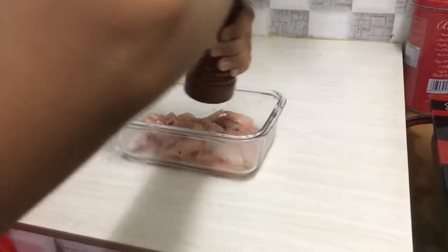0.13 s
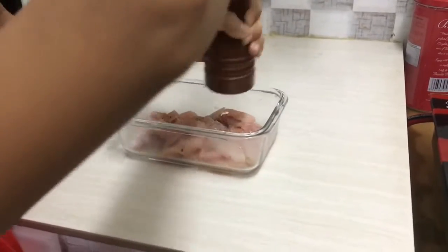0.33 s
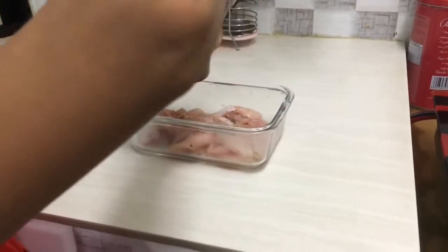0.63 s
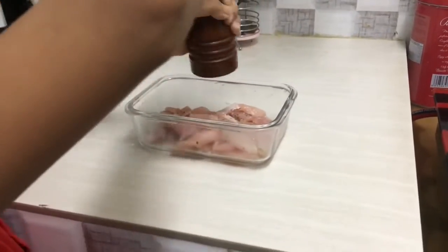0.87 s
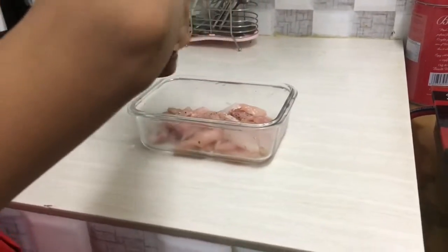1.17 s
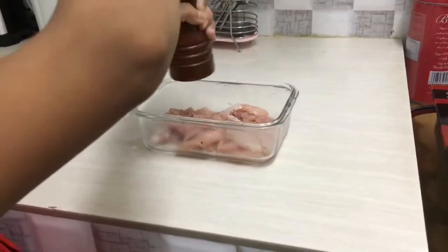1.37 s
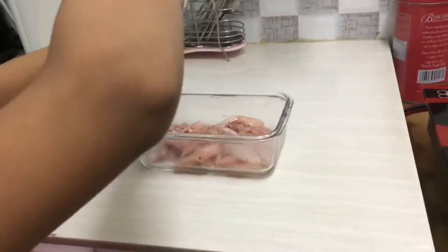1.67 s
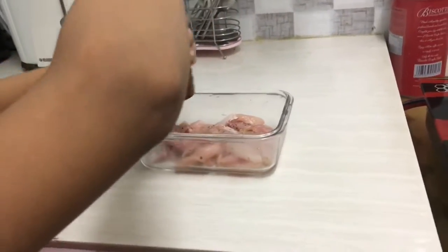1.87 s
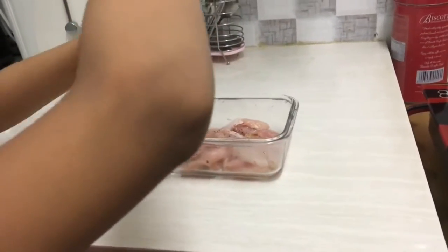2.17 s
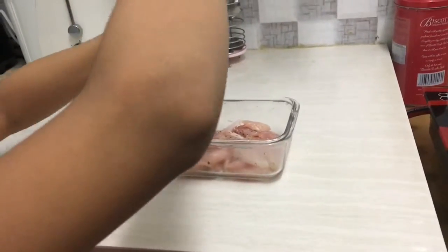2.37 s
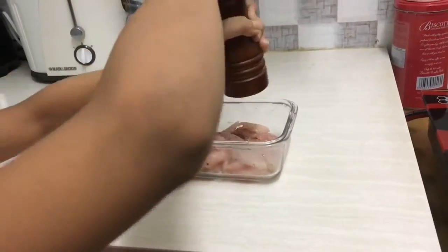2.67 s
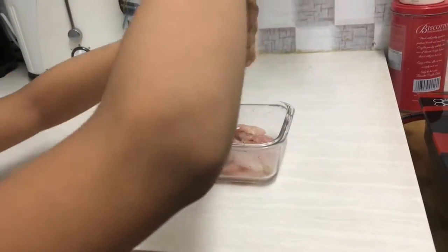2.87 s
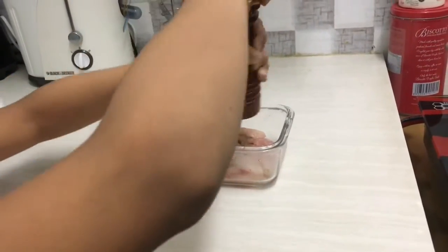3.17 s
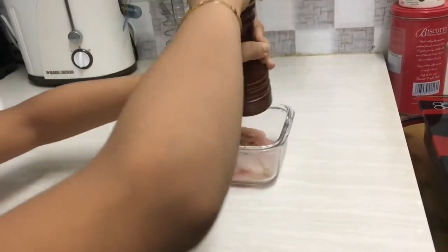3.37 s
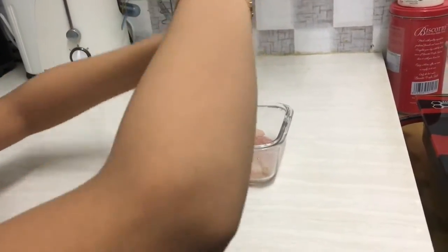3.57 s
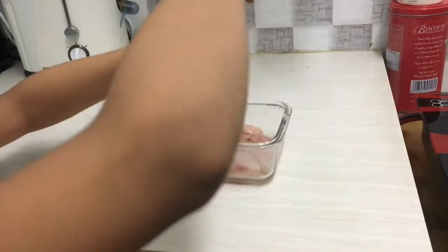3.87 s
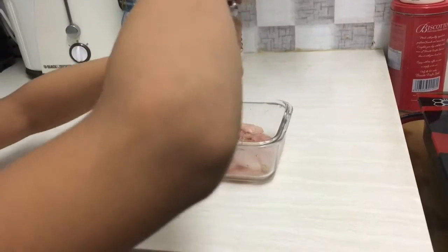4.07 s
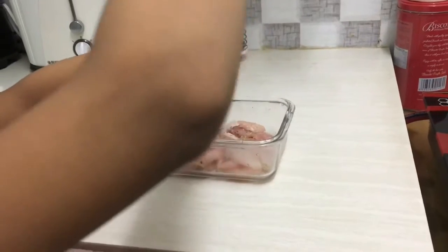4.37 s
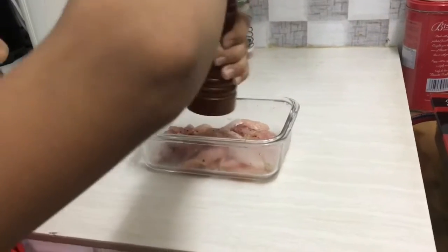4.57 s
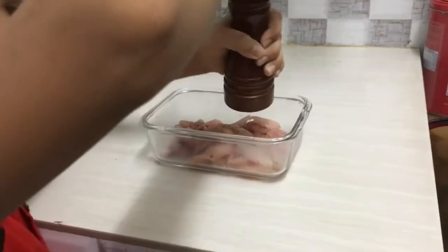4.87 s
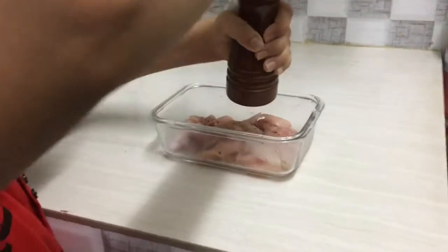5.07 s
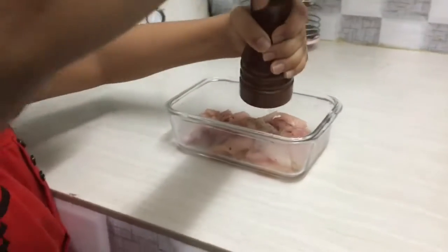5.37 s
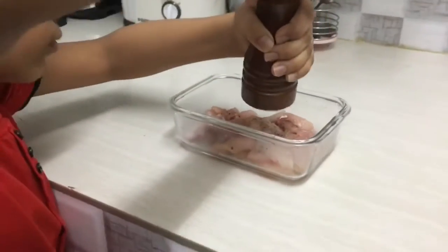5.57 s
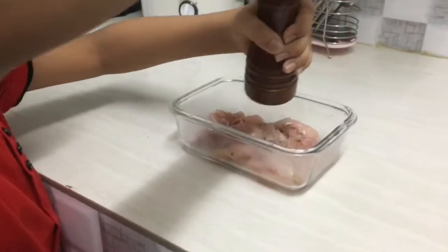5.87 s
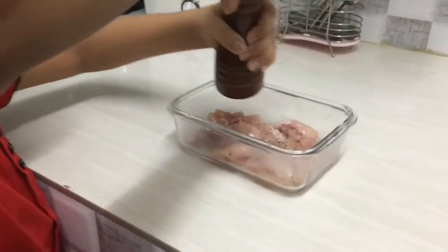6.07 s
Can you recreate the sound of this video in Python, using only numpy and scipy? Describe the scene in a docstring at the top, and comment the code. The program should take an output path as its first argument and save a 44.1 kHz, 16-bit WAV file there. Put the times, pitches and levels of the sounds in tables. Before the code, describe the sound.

A wooden pepper mill is twisted by hand close to the microphone in a quiet tiled kitchen. Short, dry, gritty rasps come about three times a second, with peppercorns snapping among them. A woody squeak comes early, a tiny ping midway, and a fainter squeak later. Grinding softens in the middle, then two very sharp cracks stand out near the end. Faint air noise and appliance hum lie underneath.

```python
"""Short gritty rasps, sharp cracks, two squeaks and one ping sound over a faint hum in a quiet tiled kitchen.
A wooden pepper mill is twisted back and forth by hand over a glass dish: random grains make the rasp,
and peppercorns caught in the burr crack as an impulse and decaying splinter noise through the mill's resonances.
Squeaks are narrow-band noise, the ping and hum are sines, and the room is decaying noise used as an echo."""
import sys
import numpy as np
from scipy import signal
from scipy.fft import rfft, irfft, next_fast_len
from scipy.io import wavfile

SR = 44100
rng = np.random.default_rng(int(sys.argv[2]) if len(sys.argv) > 2 else 0)


def bounce(signal):
    """Save signal as a 16-bit WAV file at the path given by the first command-line argument."""
    frames = np.transpose(np.atleast_2d(signal))
    limited = np.clip(frames, -1, 1)
    pcm = np.round(limited * 32767).astype(np.int16)
    wavfile.write(sys.argv[1], SR, pcm)


N = 273861

# The four frequency ranges of a crack: low_hz, high_hz, beaming (0-1), own_level_db
# (beaming: how far the room send depends on the mill's aim)
CRACK_RANGES = [(160.7, 1110, 0.43, .5), (1330, 3600, 0.33, -0.6), (4130, 9420, 0.78, 0.55),
                (8960, 15800, 0.53, 0.5)]


def from_db(db):
    """Amplitude gain is ten to the power of a twentieth of the decibels."""
    return 10 ** (np.asarray(db) / 20)


def rms_one(x):
    """Scale to unit rms, the root of the mean power."""
    return x / np.sqrt(np.mean(x ** 2) + 1e-20)


def at_hz(points, hz):
    """Interpolate a table along log frequency, where equal steps are equal intervals."""
    table = np.array(points)
    return np.interp(np.log(np.maximum(hz, 1)), np.log(table[:, 0]), table[:, 1])


def band(x, low, high, order=3):
    """Causal band-pass: a Butterworth filter, flat within its band."""
    high = min(high, SR / 2 - 1000)
    return signal.sosfilt(signal.butter(order, [low, high], "band", fs=SR, output="sos"), x)


def coloured(x, spectrum):
    """Spectral shaping: weight each frequency of a signal by a table in dB, then set its rms to 1."""
    size = next_fast_len(N)
    gain = from_db(at_hz(spectrum, np.fft.rfftfreq(size, 1 / SR)))
    return rms_one(irfft(rfft(x, size) * gain, size)[:N])


def drift(rate):
    """Slow random modulation of unit rms: chance values, rate per second, joined by straight lines."""
    knots = rng.standard_normal(4000)
    return rms_one(np.interp(np.arange(N) / SR * rate, np.arange(len(knots)), knots))


def resonance(x, hz, width):
    """A damped mode is a two-pole resonator; its bandwidth in Hz sets the decay, its peak gain is about 1."""
    r = np.exp(-np.pi * width / SR)
    numerator = np.array([1, 0, -1]) * (1 - r * r) / 2
    return signal.lfilter(numerator, [1, -2 * r * np.cos(2 * np.pi * hz / SR), r * r], x)


def background(waver_db=1.0, wander=1.0):
    """Moving air is shaped broadband noise; an appliance hums in sines of unsteady level and phase (radians)."""
    # Spectrum of the moving air: frequency_hz, relative_density_db
    air_spectrum = [(22, -15.5), (48, 1), (80, -6.5), (130, -2.5), (200, -6.5), (380, 0.5), (510, -15),
                    (680, -10), (1200, -17), (2500, -21.5), (5000, -29), (9000, -34.5), (16000, -40)]
    # Appliance hum: frequency_hz, rms_level_db (about which it wavers)
    hum_tones = [(191, -68.5), (238, -68.5), (387, -66), (652, -66)]
    air_rms_db = -59
    t = np.arange(N) / SR
    out = from_db(air_rms_db) * coloured(rng.standard_normal(N), air_spectrum)
    for hz, db in hum_tones:
        amplitude = np.sqrt(2) * from_db(db + waver_db * drift(8.3))
        out += amplitude * np.sin(2 * np.pi * hz * t + wander * drift(17))
    return out


def kitchen(x, first_echo_s=0.00057, build_s=0.0054):
    """Reverberation: counter and tiles return a dense echo that builds quickly and dies soonest in the treble."""
    # Echo strength: frequency_hz, gain_db
    echo_gain = [(150, -7.5), (500, -4), (1200, -3), (2700, -0.5), (5700, -9), (9000, -10), (15000, -10.5)]
    # Reverberation time, for a decay of 60 dB: frequency_hz, t60_s
    echo_decay = [(200, 0.29), (1000, 0.42), (2700, 0.4), (6000, 0.39), (10000, 0.32), (16000, 0.21)]
    t = np.arange(SR) / SR
    edges = np.geomspace(110, 17500, 15)
    # neighbouring bands take turns with two independent noises
    white = rng.standard_normal((2, SR))
    onset = 1 - np.exp(-np.maximum(t - first_echo_s, 0) / build_s)
    echo = np.zeros(SR)
    for k, (low, high) in enumerate(zip(edges, edges[1:])):
        hz = np.sqrt(low * high)
        fade = onset * np.exp(-np.log(1000) * t / at_hz(echo_decay, hz))
        unit_energy_fade = fade / np.sqrt(np.sum(fade ** 2))
        echo += from_db(at_hz(echo_gain, hz)) * band(white[k % 2], low, high) * unit_energy_fade
    return signal.fftconvolve(x, echo)[:N]


def ping():
    """Free vibration: a hard part is flicked and rings in a few exponentially decaying modes."""
    # The flick: start_s, level_db
    flicks = [(2.7597, -46.5)]
    # Modes of the hard part: frequency_hz, relative_level_db, t60_s
    modes = [(2710, 2, 0.09), (5950, -10, 0.24), (6070, -5, 0.24), (6080, -5, 0.25)]
    out = np.zeros(N)
    for s, db in flicks:
        start = round(s * SR)
        t = np.arange(N - start) / SR
        for hz, mode_db, t60 in modes:
            out[start:] += from_db(db + mode_db - 60 * t / t60) * np.sin(2 * np.pi * hz * t)
    return out


def squeak(width_hz=140.0, rise_s=0.008, fade_db=25.0, flutter_db=2.0):
    """Stick-slip of wood on wood: a rough, narrow tone that starts sharply, flutters and fades."""
    # Squeaks of the wooden knob: start_s, end_s, pitch_hz, initial_rms_level_db (before flutter)
    squeaks = [(1.521, 1.655, 1670, -52.5), (4.793, 4.974, 2430, -57.5)]
    t, out = np.arange(N) / SR, np.zeros(N)
    for start, end, hz, db in squeaks:
        once_filtered = resonance(rng.standard_normal(N), hz, width_hz)
        tone = resonance(once_filtered, hz, width_hz)
        gate = np.clip(np.minimum(t - start, end - t) / rise_s, 0, 1)
        out += rms_one(tone) * gate * from_db(db - np.interp(t, [start, end], [0, fade_db]))
    return out * from_db(flutter_db * drift(60))


def twisting_effort():
    """Load envelope: each twist takes hold quickly, swells or sags while the wrist turns, and dies away."""
    # Twists of the wrist, to and fro about three times a second:
    # start_s, length_s, effort_db (mid-twist), swell_db (change from start to end)
    twists = [(0.035, 0.057, -56.5, 6), (0.214, 0.16, -55.5, 0), (0.499, 0.1, -57, -0.5),
              (0.689, 0.11, -58, 6.5), (1.015, 0.081, -56, -12), (1.202, 0.15, -54.5, -4.5),
              (1.512, 0.12, -60.5, 0.5), (1.762, 0.17, -60.5, -3), (2.076, 0.13, -62.5, -1),
              (2.357, 0.16, -57, 4.5), (2.887, 0.026, -66.5, -7), (3.039, 0.063, -63.5, -3),
              (3.463, 0.18, -62, -3), (3.759, 0.11, -60, 1), (4.063, 0.16, -64, 6), (4.38, 0.07, -60, 0),
              (4.557, 0.17, -57.5, -10.5), (5.082, 0.08, -54.5, -6), (5.318, 0.15, -54.5, 2),
              (5.879, 0.094, -61, -7), (6.1, 0.083, -59, -0.5)]
    attack_s, release_s = .025, 0.035   # length of the rise; time constant of the letting go
    resting_effort_db = -75.5   # grit still shifting between twists
    t = np.arange(N) / SR
    effort = np.full(N, from_db(resting_effort_db))
    for start, length, db, swell_db in twists:
        attack = np.clip((t - start) / attack_s + .5, 0, 1)
        hold = from_db(db + swell_db * np.interp(t, [start, start + length], [-.5, .5]))
        release = np.exp(-np.maximum(t - start - length, 0) / release_s)
        effort += attack * hold * release
    return effort


def rasp(catch_db=1.5, level_db=0.5):
    """Granular friction: effort crushes more grains between the teeth; now and then a larger crumb crunches."""
    # Colour of the rasp: frequency_hz, relative_density_db
    rasp_spectrum = [(250, -35.5), (550, 5), (1050, 6), (1800, 4.5), (2800, 3), (4500, -0.5), (5600, 5),
                     (7300, -3), (9000, -2.5), (10800, -8), (13000, -6.5), (16000, -19)]
    grains_per_s, size_db = 4500, 2.8   # rate where busy is 1; scale of the random grain sizes
    crumbs_per_s, crumb_s, crumb_gain = 40, .0016, 1.7   # rate where busy is 1; decay time constant
    effort = twisting_effort()
    busy = np.sqrt(effort / effort.mean())
    born = rng.random(N) < grains_per_s * busy / SR
    sizes = from_db(size_db * np.minimum(rng.exponential(1, N), 5)) * rng.choice([-1, 1], N)
    crumbs = (rng.random(N) < crumbs_per_s * busy / SR) * rng.uniform(0.22, 0.83, N)
    crumb_decay = np.exp(-1 / (crumb_s * SR))
    crunch = 1 + crumb_gain * signal.lfilter([1], [1, -crumb_decay], crumbs + 1e-18)
    # dividing by sqrt(busy) evens out the grain power, so that effort alone sets the level
    grit = coloured(born * sizes * crunch / np.sqrt(busy), rasp_spectrum)
    return grit * effort * from_db(level_db + catch_db * drift(70))


def mill_body(force, direct_db):
    """Modal response: force on the burr is heard straight and through the short resonances of the mill."""
    # Resonances of the barrel and burr: frequency_hz, width_hz, gain_db
    body_modes = [(631, 41, 6.5), (980, 280, 0.5), (1420, 300, -8), (2340, 1250, 6), (2940, 410, -25.5),
                  (4280, 450, 3.5), (5600, 710, 9.5), (7090, 250, 7.5), (8550, 650, 0.5), (9600, 170, -5),
                  (11900, 990, 1)]
    straight = from_db(direct_db) * force
    return straight + sum(from_db(db) * resonance(force, hz, width) for hz, width, db in body_modes)


def range_levels(db, ring_hz, falloff_db):
    """Spectral tilt: a crack's level falls off by the octave on both sides of its favoured ring."""
    low, high, _, own_db = np.transpose(CRACK_RANGES)
    octaves_away = np.abs(np.log2((low + high) / 2 / ring_hz))
    return db + own_db - falloff_db * octaves_away


def in_ranges(sound, levels_db, dull_top_hz=11900.0, bright_top_hz=14800.0):
    """Band energy: set a crack's level in each range (rms over 10 ms); a dull crack also ends lower."""
    top_hz = np.interp(levels_db[-1] - levels_db[-2], [-7, -1], [dull_top_hz, bright_top_hz])
    out = 0
    for db, (low, high, *_) in zip(levels_db, CRACK_RANGES):
        part = band(sound, low, max(min(high, top_hz), low + 500))
        rms_10ms = np.sqrt(np.sum(part ** 2) / (SR // 100))
        out = out + from_db(db) * part / rms_10ms
    return out


def cracks(first_break=3.7, splinter_db=3.5, favour_db=-1.0, favour_width=1020.0,
           plain_near_db=0.5, plain_far_db=2.5):
    """Brittle fracture: one break and a dying shower of splinters; returns direct sound and room share."""
    # Peppercorns breaking: start_s, level_db (before range level and fall-off), ring_hz (favoured),
    # falloff_db_per_octave, crumble_s (time constant), room_send_db (before beaming)
    breaking_corns = [(0.232, -53, 2400, 1.5, 0.004, 17), (0.261, -34, 3100, 5.2, 0.0071, -9),
                      (0.2859, -41, 4170, 1.9, 0.0022, 7.5), (0.2894, -39, 1400, 4.8, 0.0038, -19),
                      (0.324, -43, 5500, 1.7, .0045, -2), (0.7766, -41.5, 1310, 5.1, 0.0045, -8),
                      (0.8304, -45.5, 7300, 2.7, 0.004, 2.5), (1.0095, -50, 920, 2.4, 0.0061, -15),
                      (1.0155, -52, 11900, 4.3, 0.0048, 10), (1.2136, -50, 2880, 6, 0.0047, 7),
                      (1.3688, -43, 9500, 5.2, .0045, 6), (1.3866, -48, 1800, 2.4, 0.0047, -6),
                      (1.8138, -48, 3150, 3.3, 0.0056, 2), (1.8316, -48.5, 3030, 0.88, 0.003, 12.5),
                      (1.8433, -42, 1100, 5.5, 0.0017, -9), (1.8482, -41.5, 890, 1.7, 0.0036, -7),
                      (2.0735, -51.5, 890, 6.1, 0.0059, -15), (2.313, -57, 1200, 6, 0.0036, -8),
                      (2.36, -46.5, 1470, 4, 0.0058, -19), (2.4035, -43.5, 890, 3.6, 0.012, -26),
                      (2.4157, -44, 6100, 3, 0.0043, 7.5), (2.5053, -45.5, 1340, 4.2, 0.0037, -14),
                      (2.759, -46.5, 6100, 4, 0.0033, 11), (3.1256, -44.5, 10300, 5.2, 0.0028, 9.5),
                      (3.4315, -38.5, 1950, 8, 0.0024, 1.5), (3.5605, -43, 5100, 5.7, .005, 8),
                      (3.811, -30.5, 3100, 4.83, 0.0037, 7), (4.0651, -52, 5460, 2.8, 0.0047, 9.5),
                      (4.377, -47.5, 1090, 7.5, 0.0035, -12), (4.4035, -50, 2070, 1.9, 0.013, -5),
                      (4.4142, -36, 1350, 9.8, .003, -4), (4.503, -51, 13000, 2.5, 0.0076, 6),
                      (4.567, -28, 1420, 2.9, 0.0081, -16.5), (4.5709, -32, 2370, 3.5, 0.003, 10.5),
                      (5.0398, -55.5, 1400, 5.7, 0.0027, 19), (5.0838, -37.5, 3000, 6.9, 0.0033, -10),
                      (5.13, -51.5, 7120, 4, 0.0037, 10), (5.1842, -37, 7540, 11.6, 0.0029, 0),
                      (5.201, -36, 6200, 8.1, 0.00092, -10), (5.3153, -52.5, 900, 2.7, 0.0058, 11),
                      (5.3367, -36, 1500, 5.3, 0.0033, -5), (5.376, -23, 6940, 4.9, 0.0055, -5),
                      (5.6279, -18, 7100, 5.17, 0.0036, -4), (6.138, -48, 6500, 2.8, .011, -11),
                      (6.1454, -49, 6050, 1, .002, -10)]
    t = np.arange(SR // 25) / SR
    direct, sent = np.zeros((2, N + len(t)))
    beaming = np.array(CRACK_RANGES)[:, 2]
    # the room gathers the crack from all directions, which evens out the colour of the splinters
    splinter_share = np.array([[1], [.4]])   # direct, room
    plain_db = [[plain_near_db], [plain_far_db]]
    for s, db, ring_hz, falloff_db, crumble, send_db in breaking_corns:
        signs, sizes = rng.standard_normal((2, len(t)))
        shower = rms_one(signs * from_db(splinter_db * sizes))
        splinters = shower * np.exp(-t / max(crumble, 1 / SR))
        force = first_break * (t == 0) + splinter_share * splinters
        paths = mill_body(force, direct_db=plain_db)
        # the spot where the corn is caught favours one broad resonance
        near, far = paths + from_db(favour_db) * resonance(paths, ring_hz, favour_width)
        levels = range_levels(db, ring_hz, falloff_db)
        start = round(s * SR)
        span = slice(start, start + len(t))
        direct[span] += in_ranges(near, levels)
        sent[span] += in_ranges(far, levels + beaming * send_db)
    return direct[:N], sent[:N]


def scene(rasp_room_db=-4.0):
    """Superposition: the mill close by, its echo, and the background add as pressures."""
    direct, sent = cracks()
    friction = rasp() + squeak()
    room = kitchen(sent + from_db(rasp_room_db) * friction)
    return (direct + friction + ping() + room + background())[None]


def record(dry, ceiling=1.13):
    """Soft saturation rounds the very highest peaks; a steep elliptic low-pass cuts the top."""
    cutoff_hz = 15900
    rounded = ceiling * np.tanh(dry / ceiling)
    return signal.sosfilt(signal.ellip(10, .2, 70, cutoff_hz, fs=SR, output="sos"), rounded)


dry = scene()
out = record(dry)
bounce(out)
```